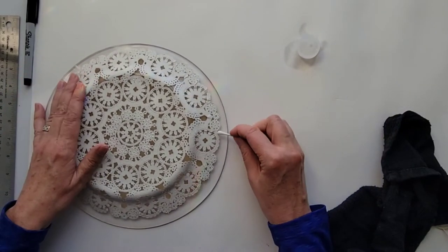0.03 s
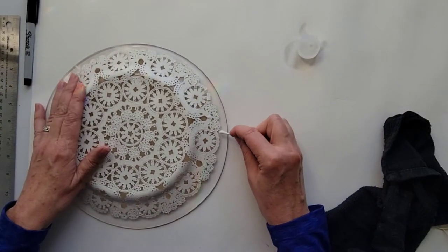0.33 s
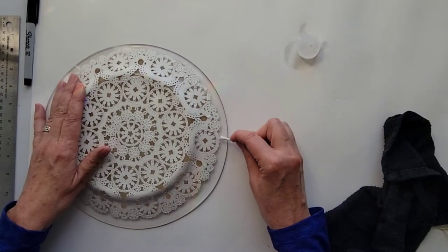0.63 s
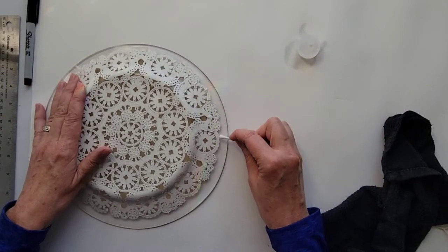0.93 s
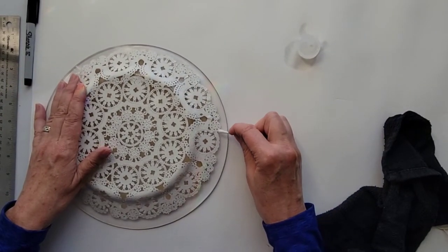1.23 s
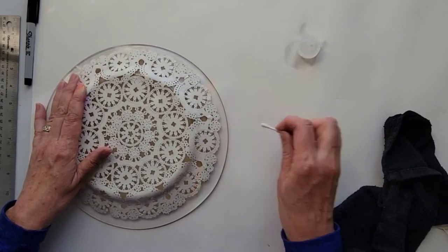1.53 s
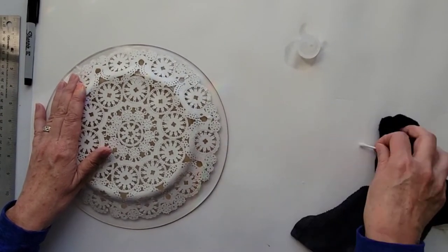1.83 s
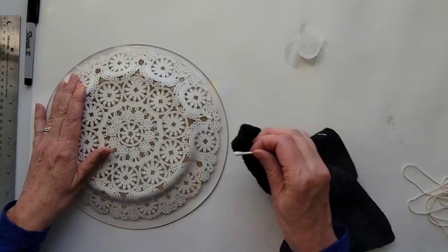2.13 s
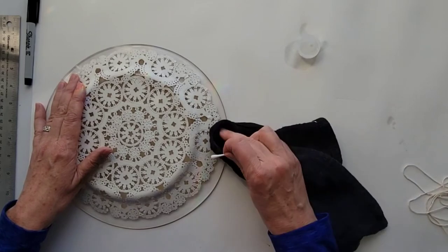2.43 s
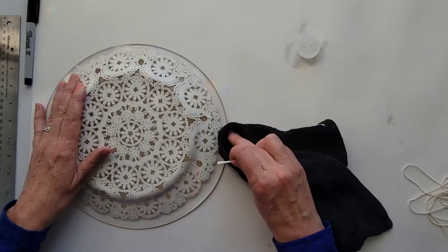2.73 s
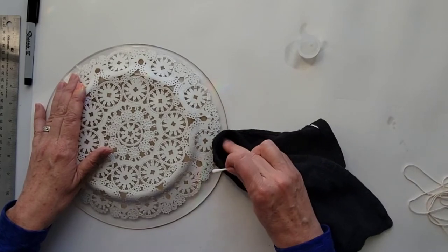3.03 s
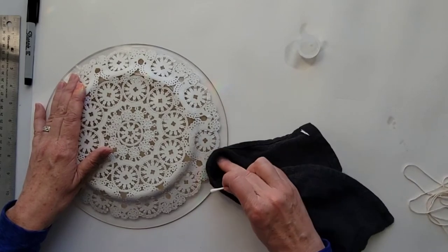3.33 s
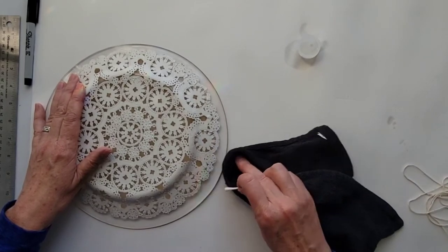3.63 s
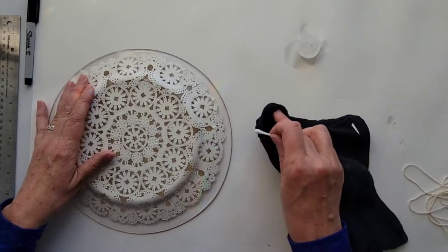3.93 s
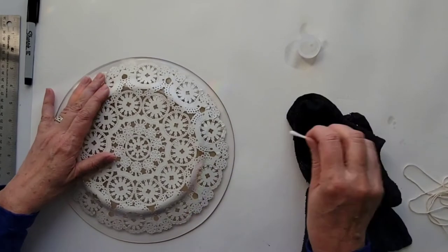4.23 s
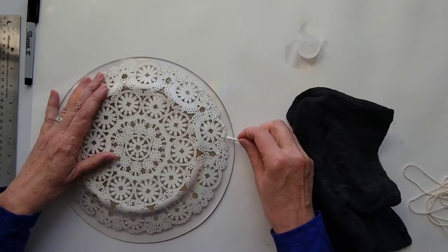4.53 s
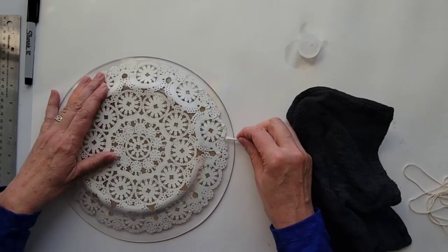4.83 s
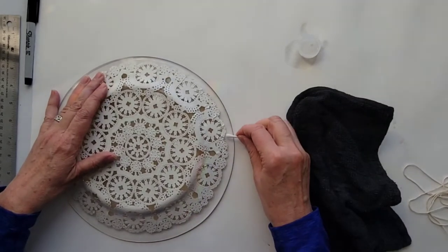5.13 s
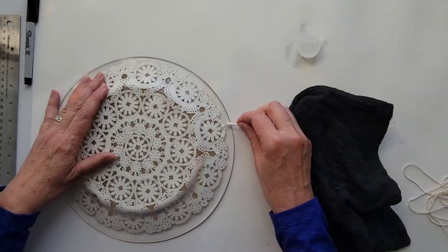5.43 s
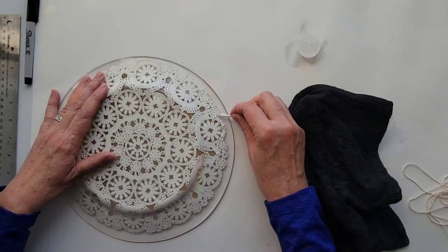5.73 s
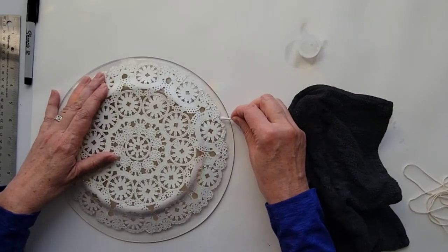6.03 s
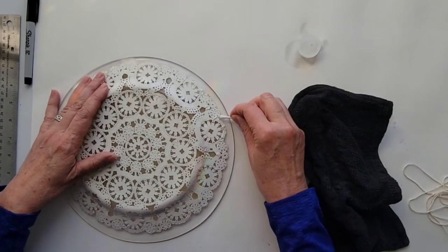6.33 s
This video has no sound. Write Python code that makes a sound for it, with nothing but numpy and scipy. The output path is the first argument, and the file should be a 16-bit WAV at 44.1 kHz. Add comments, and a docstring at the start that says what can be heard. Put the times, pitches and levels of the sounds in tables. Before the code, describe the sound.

Faint scratchy rubbing on a glass plate gives way to swishing cloth and five clacking thuds, then more light scratching.

```python
"""A damp cotton swab and a cloth clean the rim of a glass plate, upside down on a paper-covered table.
The swab sticks and slips, so it scratches and faintly squeaks. The cloth hisses over the paper and
wipes the edge, while the finger inside it knocks the plate (a clack) and the table (a thud).
Then the plate is turned a little, grinding on the paper, and swabbed again.
Under it all are the low shuffle of the hands and the faint rumble of a quiet room."""
import sys
import numpy as np
from scipy import signal
from scipy.fft import rfft, irfft, next_fast_len
from scipy.io import wavfile

SR = 44100
rng = np.random.default_rng(int(sys.argv[2]) if len(sys.argv) > 2 else 0)


def transcribe(u):
    """Save the signal u as a 16-bit wav file named by the first command-line argument.

    u: samples, shape (n,) or (channels, n), limited to [-1, 1]; the rate is SR.
    q: integer samples, one column per channel.
    """
    v = np.clip(np.atleast_2d(u).T, -1, 1)
    q = np.round(v * 32767).astype(np.int16)
    wavfile.write(sys.argv[1], SR, q)


N = 281313
TIME = np.arange(N) / SR

# Levels in dB are relative: the functions turn each layer up or down as a whole.
# Swab strokes on the rim. Each row: start in seconds, length in seconds, friction level in dB.
SWAB_STROKES = [(0.0, 0.049, -76.5), (0.095, 0.055, -78), (0.227, 0.11, -79.5), (0.377, 0.079, -79),
                (.48, .09, -82), (0.613, 0.13, -71), (0.797, .17, -71), (0.958, 0.069, -77.5),
                (1.063, .15, -70), (1.322, 0.17, -76.5), (1.429, 0.12, -77), (1.536, 0.047, -79),
                (4.357, 0.16, -80), (4.502, .15, -79), (4.694, 0.062, -80.5), (4.837, 0.16, -72.5),
                (4.905, 0.038, -66.5), (5.7, .11, -70.5), (5.858, 0.093, -71), (5.954, .1, -75),
                (6.093, 0.094, -76.5), (6.196, 0.098, -76), (6.305, 0.13, -74.5)]
# Squeaks of damp cotton. Each row: start in seconds, length in seconds, pitch in Hz, level in dB.
SWAB_SQUEAKS = [(0.0, .3, 1780, -76.5), (0.248, 0.35, 1730, -81.5), (0.897, 0.051, 1530, -66),
                (2.491, 0.014, 1150, -63.5), (4.927, 0.025, 1388, -66), (5.886, 0.056, 1480, -75)]
# Moments when the rim catches. Each row: time in seconds, level in dB.
RIM_CATCHES = [(.637, -29.5), (.905, -25), (.925, -25.5), (1.298, -33), (2.496, -37), (4.921, -24),
               (4.940, -41), (5.484, -10), (5.491, -16), (5.90, -36)]
# Cloth strokes, each with a hollow between cloth and table. Each row: start in seconds,
# length in seconds, friction level in dB, the hollow's pitch in Hz, the hollow's level in dB.
CLOTH_STROKES = [(1.815, 0.12, -60.5, 3673, -2), (1.875, 0.14, -64, 3046, -17),
                 (1.966, 0.15, -62, 3858, 3.5), (2.035, 0.17, -60.5, 3150, 1.5),
                 (2.18, 0.1086, -71.5, 2900, -10.5), (2.333, 0.12, -78.5, 3200, -5),
                 (2.419, 0.094, -68, 3340, -19), (2.684, .075, -63, 3300, -9), (2.771, .1, -72, 3204, 1),
                 (2.899, 0.081, -62, 3185, -3), (3.005, .1, -70.5, 3058, 1.5),
                 (3.116, 0.094, -64.5, 3095, -5.5), (3.212, .11, -70.5, 3080, 3.5),
                 (3.336, 0.0916, -68, 3150, -2), (3.428, 0.106, -69, 3170, 0.5),
                 (3.561, .2, -61.5, 3290, -2), (3.756, 0.13, -69, 2738, 3.5), (3.849, .13, -70, 2837, 3),
                 (3.936, 0.15, -70, 2700, -10.5), (4.042, 0.18, -70, 2633, -5)]
# When swab and cloth keep rustling between strokes. Each row: start in seconds, length in seconds.
SWAB_TOUCHING = [(0.0, 1.9), (4.37, 2.0)]
CLOTH_TOUCHING = [(1.82, 3.2)]
# Finger blows on the rim. Each row: time in seconds, table thud in dB, glass clack in dB,
# the thud's treble limit in Hz (lower is softer), wait for the second clack in seconds.
FINGER_KNOCKS = [(1.823, -6.5, -34, 45, .011), (2.408, -15.5, -30, 600, .009),
                 (2.6493, -1, -2.5, 3000, .0039), (2.8782, -2.5, -3, 3000, .0025),
                 (3.092, -0.5, 0.5, 3000, 0.00266), (3.329, 2, 3.5, 3000, 0.0089),
                 (3.5274, 0.5, 1.5, 3020, .0083), (6.157, -24.5, -49, 110, 0.0075)]
# The push that turns the plate. Each row: start in seconds, length in seconds, hiss level in dB.
TURN_PUSHES = [(5.286, 0.39, -64)]
# The rim grinding in that push. Each row: start in seconds, length in seconds, level in dB.
RIM_GRINDS = [(5.305, 0.13, -71), (5.46, 0.19, -66.5), (5.53, 0.063, -62.5)]
# Bumps as the plate rocks under the hand. Each row: time in seconds, level in dB.
ROCKING_BUMPS = [(0.637, -48.5), (0.653, -47.5), (0.848, -62), (0.994, -59.5), (1.125, -54), (1.152, -52),
                 (1.373, -56.5), (4.71, -52), (4.7234, -50.5), (4.797, -62.5), (5.189, -63), (5.572, -51),
                 (5.584, -59), (6.003, -62), (6.232, -60)]
# The hands' weight on plate and table, then the table's rumble. Each row: time in seconds, level in dB.
HAND_LEVELS = [(0.0, -75), (0.37, -75.5), (1.03, -68.5), (1.65, -78.5), (2.24, -73), (2.66, -77),
               (3.16, -66.5), (4.19, -79), (4.87, -77), (5.22, -78.5), (5.79, -75.5), (6.38, -76.5)]
RUMBLE_LEVELS = [(0.0, -71), (1.1, -67), (1.69, -81), (1.95, -68), (2.54, -71.5), (2.91, -60), (3.5, -58),
                 (4.01, -72.5), (5.77, -72.5), (6.38, -64)]

# A mode is one tone an object rings at; its ring time (t60) is how long it takes to fade by 60 dB.
# The hand-damped glass, then its rocking. Each row: pitch in Hz, level in dB, ring time in seconds.
GLASS_MODES = [(764, -52.5, 0.15), (769.7, -49, 0.16), (926, -47.5, 0.078), (980, -51, 0.094),
               (1056, -48, 0.63), (1142, -43, 0.051), (1170, -59.5, 0.057), (1341, -54, 0.17),
               (1376, -50, 0.071), (1557, -51, 0.038), (1688, -53.5, 0.073), (1710, -45.5, 0.13),
               (1926, -51, 0.056), (2055, -46, 0.045), (2233, -50, 0.041), (2357, -51.5, 0.028),
               (2643, -54, 0.041), (2844, -45.5, 0.029), (3350, -63, 0.019), (3450, -66, 0.03),
               (3406, -51.5, 0.072), (4160, -60, 0.02), (4650, -61, 0.044), (4940, -52.5, 0.026)]
ROCKING_MODES = [(341.6, 2, 0.077), (383, 0, 0.055), (486, -12, 0.079), (712, -2.5, 0.014)]
# The table with the plate on it. Each row: pitch in Hz, level in dB, ring time in seconds,
# direction of the first swing (1 or -1).
TABLE_MODES = [(62, -34.5, .16, -1), (77, -26, .074, 1), (113, -39, .2, -1), (155, -25, .03, -1),
               (193, -48.9, .22, 1), (235, -26.6, .047, 1), (267, -34.3, .03, -1), (359, -30.6, .058, 1),
               (397, -32.7, .084, -1), (519, -47, .092, -1), (599, -47.7, .076, -1)]

# The tone colour of each noise and of the room's echo. Each row: frequency in Hz, level in dB.
SWAB_COLOUR = [(300, -7), (700, -4.5), (1400, 3.5), (2200, -2), (3200, 2.5), (4500, 1.5), (5600, -5),
               (7400, -5), (9000, -12), (11500, -18), (13000, -11.5), (16000, -15)]
CLOTH_COLOUR = [(200, -14), (500, -9), (900, -12.5), (1400, -12.5), (1900, -14), (2600, -4.5), (3300, -5.5),
                (4500, -0.5), (6000, -3), (7800, -4.5), (9500, -8.5), (11500, -15), (13000, -11.5),
                (16000, -12)]
CRACK_COLOUR = [(300, 3), (800, -2), (1200, -9), (2200, -4.5), (3500, -14.5), (5000, -18), (8000, -31),
                (16000, -45)]
TURN_COLOUR = [(400, -8), (1000, -1), (2000, -2.5), (3200, 3), (4500, -2.5), (6000, -8.5), (7600, -7.5),
               (9000, -12), (11500, -17), (13000, -13.5), (16000, -13)]
HANDS_COLOUR = [(40, -9.5), (75, 8.5), (150, -5), (280, -0.5), (380, -1.5), (480, -0.5), (650, -17.5),
                (1200, -24.5), (3000, -48.5)]
ROOM_COLOUR = [(60, 3), (300, -2.5), (1000, -6), (4000, -12.5), (8000, -11), (16000, -14)]
AIR_COLOUR = [(15, -32), (25, -1.5), (113, -2.5), (268, -15.5), (291, -10), (333, -18.5), (460, -39),
              (512, -15), (833, -18), (903, -17.5), (1430, -22.5), (1720, -21.5), (1920, -30),
              (2880, -26.5), (15700, -50)]
# How alike left and right sound. Each row: frequency in Hz, likeness from -1 (opposite) to 1 (same).
STEREO_LIKENESS = [(60, 0.88), (250, 0.69), (500, 0.076), (1000, -0.45), (2000, -0.31), (4000, -0.17),
                   (6000, -0.035), (8000, 1), (14000, 0.96)]
# Echoes off the table, nearby things and a wall. Each row: left delay and right delay in milliseconds, level in
# dB.
CLOSE_ECHOES = [(.78, 0.85, -24), (2.15, 2, -16), (3.38, 3.41, -12), (4.3, 2.8, -15.5), (5.3, 4.5, -6.5),
                (6.8, 5.8, -10.5), (8.75, 13, -6.5)]


def swab(stroke_db):
    """Wet cotton sticks and slips on the rim: a faint scratch with some ringing glass in it."""
    friction_db = stroke_db + drift(rate_hz=77)
    scratch = from_db(friction_db - 1.5) * coloured(slips(per_s=5000, spread_db=-3), SWAB_COLOUR)
    return nearby(scratch) + rubbed_glass(friction_db - 5, per_s=830, spread_db=-0.5, low_cut_hz=1830)


def swab_friction():
    """How strongly the swab rubs, in dB: strokes on top of a faint creep while it touches the rim."""
    creep = [from_db(-86) * stroke(start, length, attack_s=0.03, release_s=0.05)
             for start, length in SWAB_TOUCHING]
    strokes = [from_db(db) * arch(start, length) for start, length, db in SWAB_STROKES]
    return summed_db(creep + strokes)


def squeaks():
    """For a moment the cotton's slips lock to one pitch."""
    pitch, swell = np.zeros(N), np.zeros(N)
    for start, length, hz, db in SWAB_SQUEAKS:
        progress = (TIME - start) / length
        pitch[progress > 0] = hz
        swell += from_db(db) * 2 * np.sqrt(np.maximum(progress * (1 - progress), 0))
    return swell * from_db(-4) * singing(pitch, width_hz=72)


def catches():
    """A sudden slip of the rim gives a short, gritty tick."""
    hits = clicks(*np.transpose(RIM_CATCHES))
    grit = fading(hits, t60=0.04) * slips(per_s=3000, spread_db=2)[0]
    force = 0.56 * hits + from_db(-15.5) * grit
    return glass(force - low_pass(force, 1500, order=1))


def cloth():
    """Cloth hisses over paper, duller when slow; the hollow under it sings as the hand reshapes it."""
    strokes = [row[:3] for row in CLOTH_STROKES]
    resting = [(start, length, -80) for start, length in CLOTH_TOUCHING]
    gains = [from_db(db) * stroke(start, length, attack_s=0.4 * length, release_s=0.54 * length)
             for start, length, db in strokes + resting]
    friction_db = summed_db(gains) + 0.5 * drift(rate_hz=35)
    hiss = coloured(slips(per_s=12000, spread_db=1), CLOTH_COLOUR)
    dull = low_pass(hiss, 2240, order=1)
    brightness = from_db(np.clip(0.69 * (friction_db + 62.5), -9, 1.5))
    rubbing = (dull + brightness * (hiss - dull)) / np.sqrt(brightness)
    start, length, _, hollow_hz, hollow_db = np.transpose(CLOTH_STROKES)
    middle = start + length / 2
    hollow_gain = from_db(np.interp(TIME, middle, hollow_db) - 3)
    hollow = hollow_gain * singing(np.interp(TIME, middle, hollow_hz), width_hz=565)
    return nearby(from_db(friction_db + 2.5) * (rubbing + hollow))


def knocks():
    """The plate clacks twice and chatters against the finger, which damps it; the table thuds."""
    times, thud_db, clack_db, treble_hz, wait_s = np.transpose(FINGER_KNOCKS)
    push = sum(low_pass(clicks([time], [db]), hz, order=1)
               for time, db, hz in zip(times, thud_db, treble_hz))
    thud = table(delayed(push, seconds=0.0021))
    hits = clicks(times, clack_db - 5) + clicks(times + wait_s, clack_db - 17)
    chatter = fading(hits, t60=0.06) * slips(per_s=1500, spread_db=2)[0]
    force = low_pass(hits + from_db(-22.5) * chatter, 2320)
    clack = glass(force, longest_t60=0.1)
    crack_gain = from_db(-42.5) * low_pass(fading(hits, t60=0.12), 130, order=1)
    return thud + clack + crack_gain * noise(CRACK_COLOUR)


def turning():
    """The rim grinds over the paper and the glass rings along."""
    push = sum(from_db(db) * stroke(start, length, attack_s=0.1, release_s=0.21)
               for start, length, db in TURN_PUSHES)
    hiss = from_db(2.5) * push * coloured(slips(per_s=4000, spread_db=-2), TURN_COLOUR)
    grind_db = summed_db(from_db(db) * stroke(start, length, attack_s=0.011, release_s=0.061)
                         for start, length, db in RIM_GRINDS)
    return nearby(hiss) + rubbed_glass(grind_db, per_s=800, spread_db=2, low_cut_hz=2200)


def rubbed_glass(level_db, per_s, spread_db, low_cut_hz):
    """Tiny slips keep the plate ringing and favour its higher tones."""
    force = slips(per_s, spread_db)[0]
    force = force - low_pass(force, low_cut_hz, order=1)
    return glass(force * from_db(level_db)) / np.std(body(force, GLASS_MODES))


def glass(force, longest_t60=0.22):
    """The plate rings; neighbouring tones come from different parts of it."""
    modes = [(hz, db, min(t60, longest_t60)) for hz, db, t60 in GLASS_MODES]
    one_part = placed(body(force, modes[::2]), lag_ms=0.38, pan_db=0.5)
    other_part = placed(body(force, modes[1::2]), lag_ms=0.25, pan_db=-1)
    return one_part + other_part


def table(force):
    """The table top booms when it is pushed."""
    boom = sum(direction * ring(force, hz, db, t60) for hz, db, t60, direction in TABLE_MODES)
    return placed(boom, lag_ms=0.1, pan_db=-1)


def hands(stroke_db):
    """The plate bumps softly as it rocks and murmurs under the swab; the hands add a low shuffle."""
    bumps = body(low_pass(clicks(*np.transpose(ROCKING_BUMPS)), 900), ROCKING_MODES)
    murmur = from_db(stroke_db - 4.5) * rms_one(body(rng.standard_normal(N), ROCKING_MODES))
    shuffle = from_db(level(HAND_LEVELS) + 4.5 + 2 * drift(rate_hz=17)) * noise(HANDS_COLOUR)
    return placed(bumps + murmur, lag_ms=0.42, pan_db=0) + shuffle


def skin_drag():
    """Skin judders over the table top and sets it rumbling."""
    judder = low_pass(rng.standard_normal(N), 91, order=1)
    return from_db(level(RUMBLE_LEVELS) - 7) * rms_one(table(judder))


def nearby(sound):
    """Close, slightly dull echoes mix with a hiss and make it sound hollow."""
    left, right = low_pass(sound, 7000)
    echoes = sum(from_db(db) * np.array([delayed(left, left_ms / 1000), delayed(right, right_ms / 1000)])
                 for left_ms, right_ms, db in CLOSE_ECHOES)
    return sound + echoes


def room(sound, t60, echo_db):
    """Echoes from nearby walls blur into a short tail."""
    tail = noise(ROOM_COLOUR) * fading(clicks(times=[0.006], dbs=[0]), t60)
    tail = tail[:, :SR // 2] / np.sqrt(np.sum(tail ** 2) / 2)
    return sound + from_db(echo_db) * signal.fftconvolve(sound, tail, axes=1)[:, :N]


def background():
    """The room's faint rumble and a thin, very high hiss."""
    air = from_db(-71.5) * noise(AIR_COLOUR)
    treble_only = signal.butter(8, 12000, "high", fs=SR, output="sos")
    return air + from_db(-87.5) * signal.sosfilt(treble_only, rng.standard_normal(N))


def stroke(start, length, attack_s, release_s):
    """A hand speeds up over attack_s and slows to a stop over release_s."""
    speeding_up = np.clip((TIME - start) / attack_s, 0, 1)
    slowing_down = np.clip((start + length - TIME) / release_s, 0, 1)
    return np.sin(np.pi / 2 * speeding_up * slowing_down)


def arch(start, length):
    """A short flick of the fingers: the speed rises and falls straight away."""
    progress = np.clip((TIME - start) / length, 0, 1)
    return np.abs(np.sin(np.pi * progress)) ** 1.06


def slips(per_s, spread_db):
    """Fibres catch and let go: two streams of dense clicks of uneven size."""
    sizes = from_db(spread_db * np.minimum(rng.exponential(1, (2, N)), 4)) * rng.standard_normal((2, N))
    return rms_one(sizes * (rng.random((2, N)) < per_s / SR))


def singing(hz, width_hz):
    """A breathy tone: slow noise is shifted up to a pitch that may move."""
    carrier = np.exp(2j * np.pi * np.cumsum(hz) / SR)
    slow_noise = low_pass(rng.standard_normal((2, N)) + 1j * rng.standard_normal((2, N)), width_hz)
    return rms_one((slow_noise * carrier).real)


def body(force, modes):
    """An object rings in all its modes at once; neighbours swing in opposite directions."""
    return sum((-1) ** k * ring(force, *mode) for k, mode in enumerate(modes))


def ring(force, hz, db, t60):
    """A force sets off one tone that dies away."""
    decay, angle = from_db(-60 / (t60 * SR)), 2 * np.pi * hz / SR
    feedback = [1, -2 * decay * np.cos(angle), decay * decay]
    return from_db(db) * signal.lfilter([0, np.sin(angle)], feedback, force + 1e-18)


def clicks(times, dbs):
    """One click at each time."""
    out = np.zeros(N)
    np.add.at(out, np.round(np.asarray(times) * SR).astype(int), from_db(dbs))
    return out


def fading(hits, t60):
    """A loudness curve that jumps at each click and dies away."""
    return signal.lfilter([1], [1, -from_db(-60 / (t60 * SR))], hits + 1e-18)


def noise(colour):
    """Steady stereo noise with this tone colour."""
    return coloured(rng.standard_normal((2, N)), colour)


def coloured(pair, colour):
    """Turn two unrelated signals into one stereo sound with this tone colour."""
    size = next_fast_len(N)
    hz = np.arange(size // 2 + 1) * SR / size
    mid, side = rfft(pair, size) * from_db(at_hz(colour, hz))
    alike = np.clip(at_hz(STEREO_LIKENESS, hz), -1, 1)
    left_right = np.sqrt(1 + alike) * mid + np.sqrt(1 - alike) * side * [[1], [-1]]
    return rms_one(irfft(left_right, size)[:, :N])


def placed(sound, lag_ms, pan_db):
    """The sound reaches the right side first; a positive pan_db makes the left louder."""
    return np.array([delayed(sound, lag_ms / 1000) * from_db(pan_db / 2), sound * from_db(-pan_db / 2)])


def delayed(sound, seconds):
    """The same sound a little later."""
    return np.interp(TIME - seconds, TIME, sound, left=0)


def drift(rate_hz):
    """A smooth random wobble, about 1 in size."""
    return rms_one(low_pass(rng.standard_normal(N + SR), rate_hz)[SR:])


def low_pass(sound, hz, order=2):
    """Soften everything above this frequency."""
    return signal.sosfilt(signal.butter(order, min(hz, SR / 2 - 1), fs=SR, output="sos"), sound + 1e-18)


def level(points):
    """Join (seconds, dB) points into a curve."""
    return np.interp(TIME, *np.transpose(points))


def at_hz(points, hz):
    """Read between a table's frequencies, giving each octave equal room."""
    point_hz, values = np.transpose(points)
    return np.interp(np.log(hz + 1), np.log(point_hz), values)


def summed_db(gains):
    """Add overlapping strokes by power and give the total in dB."""
    return 10 * np.log10(sum(gain ** 2 for gain in gains) + 1e-14)


def rms_one(sound):
    """Scale to an average power of 1."""
    return sound / np.sqrt(np.mean(sound ** 2) + 1e-20)


def from_db(db):
    """Turn decibels into a multiplier."""
    return 10 ** (np.asarray(db) / 20)


def scene():
    """All the cleaning sounds echo in the room, over its quiet background."""
    quiet = background()
    stroke_db = swab_friction()
    cleaning = swab(stroke_db) + squeaks() + cloth() + turning() + knocks() + catches()
    handling = hands(stroke_db) + skin_drag()
    return room(cleaning + handling, t60=0.16, echo_db=-15.5) + quiet


def record(dry):
    """Cut the treble steeply above 15800 Hz."""
    return signal.sosfilt(signal.ellip(12, 0.1, 70, 15800, fs=SR, output="sos"), dry)


dry = scene()
out = record(dry)
transcribe(out)
```